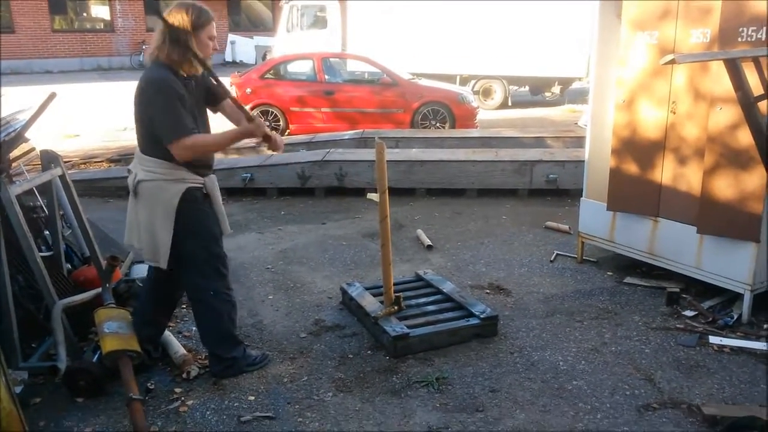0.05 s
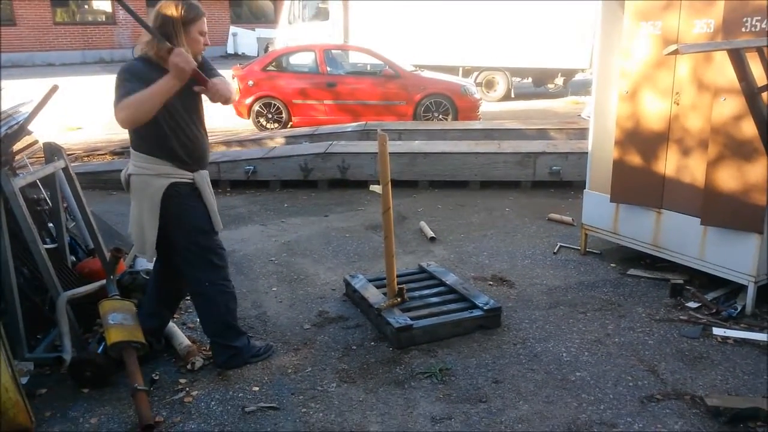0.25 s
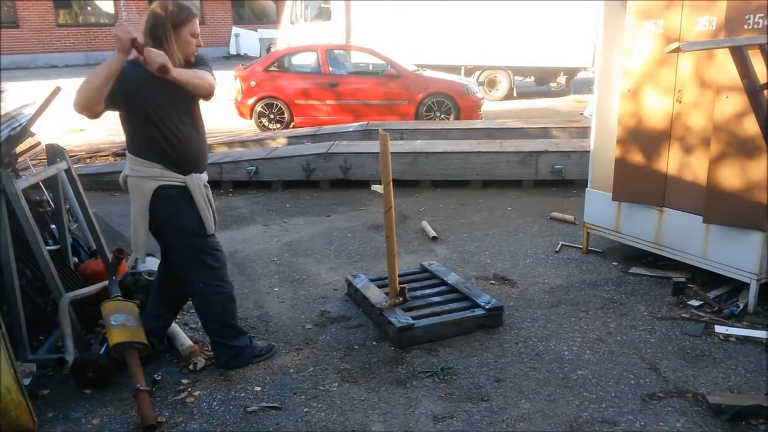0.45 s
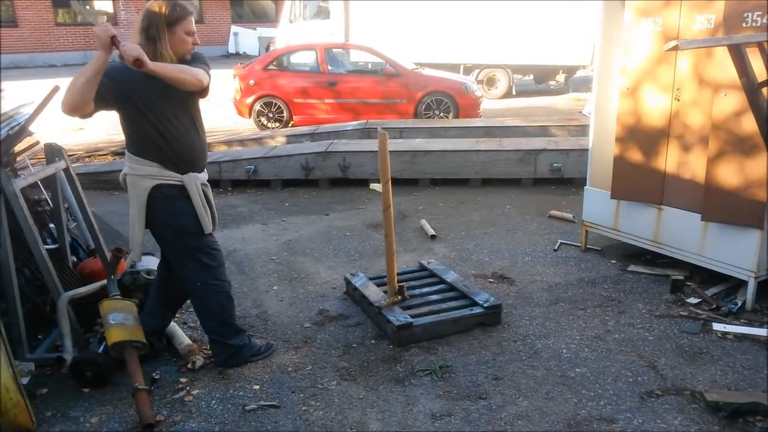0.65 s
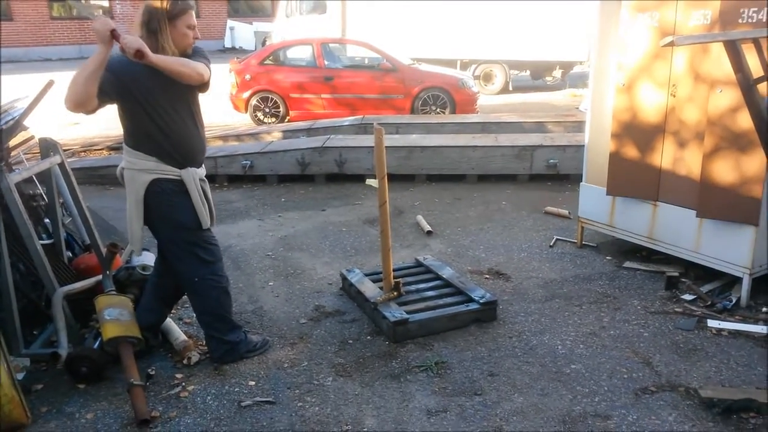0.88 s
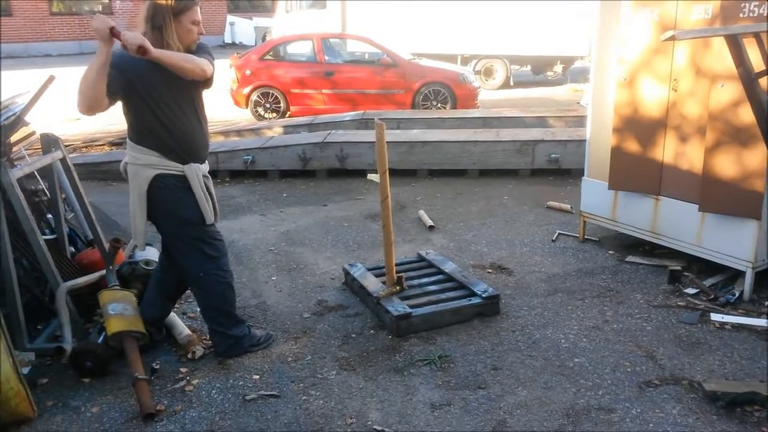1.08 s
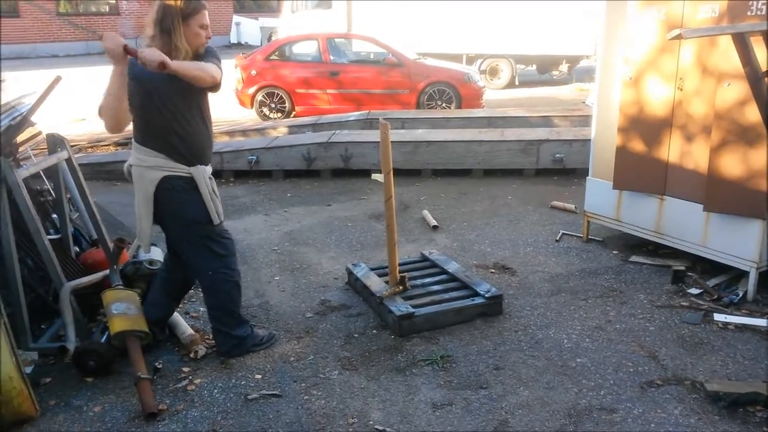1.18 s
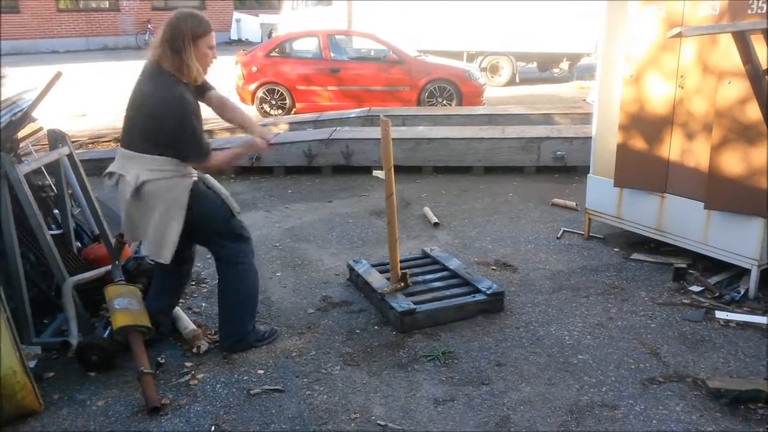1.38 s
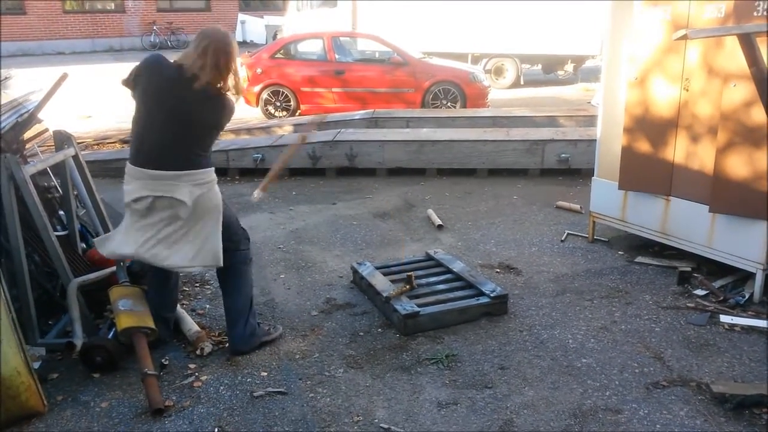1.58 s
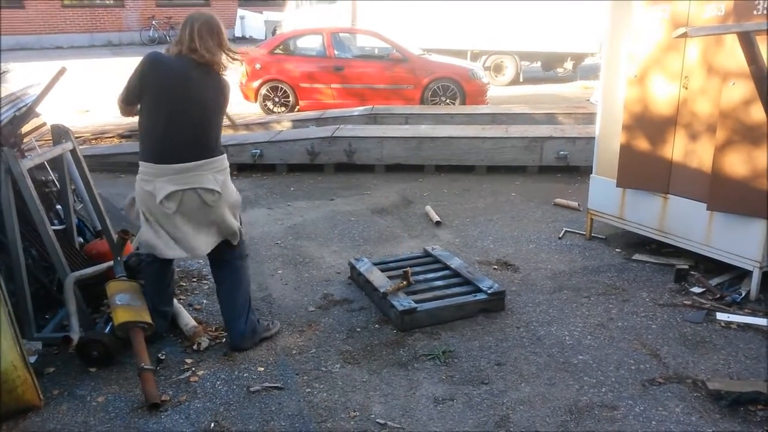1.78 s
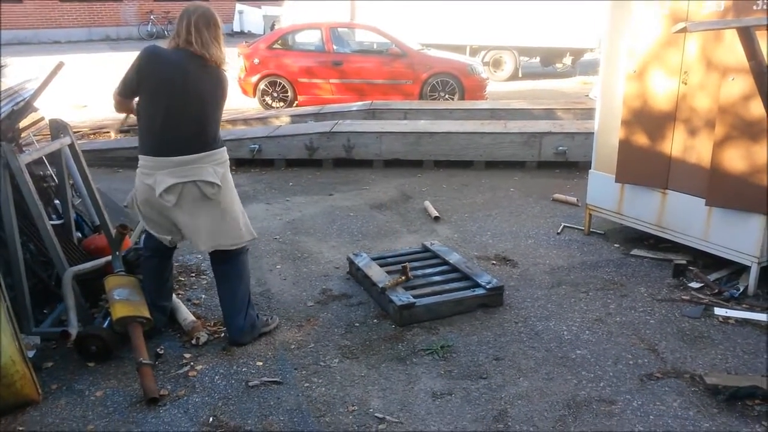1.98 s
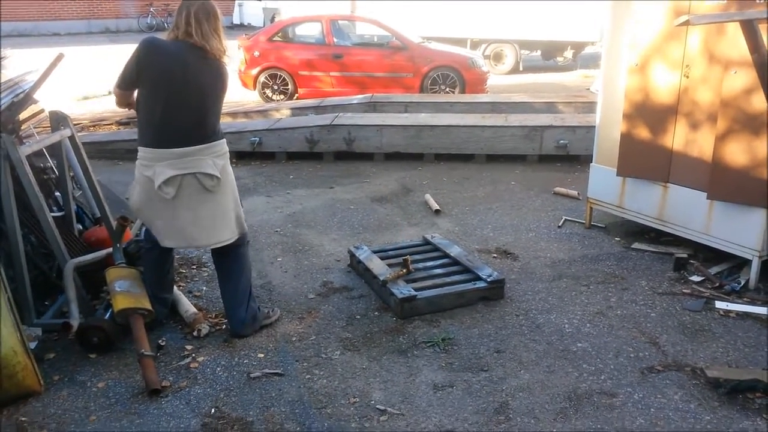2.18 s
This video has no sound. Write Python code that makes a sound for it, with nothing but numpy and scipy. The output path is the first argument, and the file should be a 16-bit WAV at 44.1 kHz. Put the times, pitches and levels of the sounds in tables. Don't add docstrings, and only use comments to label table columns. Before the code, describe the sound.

Sudden hard chop splits a wooden pole, then splinters tick and cut pieces clatter on the ground

```python
import sys
import numpy as np
from scipy import signal
from scipy.fft import rfft, irfft
from scipy.io import wavfile
from scipy.ndimage import uniform_filter1d

SR = 44100
rng = np.random.default_rng(int(sys.argv[2]) if len(sys.argv) > 2 else 0)


def elevation(decibels):
    levels = np.asarray(decibels, float)
    return 10 ** (levels / 20)


def int16_out(signal):
    q = np.round(np.clip(np.atleast_2d(signal).T, -1, 1) * 32767)
    wavfile.write(sys.argv[1], SR, q.astype(np.int16))


N = 99048
TIME = np.arange(N) / SR


def rms_one(x):
    return x / np.sqrt(np.mean(x ** 2) + 1e-20)


def at_hz(points, hz):
    table_hz, value = np.array(points).T
    return np.interp(np.log(hz), np.log(table_hz), value)


def filtered(x, order, hz, kind):
    return signal.sosfilt(signal.butter(order, hz, kind, fs=SR, output="sos"), x)


def drift(rate):
    every = 40
    r = np.exp(-2 * np.pi * rate * every / SR)
    slow = signal.lfilter([1], [1, -2 * r, r * r], rng.standard_normal(N // every + 2002))[2000:]
    return np.interp(np.arange(N) / every, np.arange(len(slow)), rms_one(slow - slow.mean()))


def grains(per_s, spread_db):
    size_db = spread_db * np.minimum(rng.exponential(1, N), 4)
    sizes = elevation(size_db) * rng.choice([-1, 1], N)
    return rms_one(sizes * (rng.random(N) < per_s / SR))


def dying(s, db, decay_s):
    since = np.maximum(TIME - s, 0)
    return elevation(db) * (TIME >= s) * np.exp(-since / max(decay_s, 1e-4))


# frequency in Hz, likeness from -1 to 1.
LIKENESS = [(60, 0.93), (290, 0.73), (620, 0.72), (1360, 0.0021), (3000, 0.34)]


def bands(size):
    edges = 22 * 2 ** np.arange(0, 10, .5)
    white = rng.standard_normal((2, 2, size))
    for k, (low, high) in enumerate(zip(edges, edges[1:])):
        mid, side = filtered(white[k % 2], 2, [low, high], "band")
        hz = np.sqrt(low * high)
        alike = np.clip(at_hz(LIKENESS, hz), -1, 1)
        yield hz, np.sqrt(1 + alike) * mid + np.sqrt(1 - alike) * side * [[1], [-1]]


# frequency in Hz, level in dB per Hz.
TOWN = [(25, -19), (60, 0.5), (150, -6.5), (450, -11), (800, -10), (2300, -21), (5000, -24.5), (14000, -30)]
TOWN_DB = -44


def town():
    together_db = 1.2 * drift(1.7)
    noise = 0
    for hz, band in bands(size=N):
        patchy_db = (-0.2 + 90 / hz) * drift(13.0)
        noise = noise + elevation(at_hz(TOWN, hz) + together_db + patchy_db) * band
    return elevation(TOWN_DB) * rms_one(noise)


# multiple of the mains frequency, level in dB rms.
HUM = [(2, -59), (3, -54.5), (4, -53.5), (5, -61), (6, -50.5), (7, -63), (10, -78), (12, -62.5),
       (14, -54.5), (16, -57), (18, -61), (20, -64), (24, -72)]
MAINS_HZ, HUM_WAVER_DB = 49.8, 2.5


def hum():
    out = 0
    for multiple, db in HUM:
        level = np.sqrt(2) * elevation(db + HUM_WAVER_DB * drift(12.0))
        out = out + level * np.sin(2 * np.pi * (round(multiple) * MAINS_HZ * TIME + rng.random()))
    return out


# frequency in Hz, t60 in seconds.
YARD_T60 = [(100, 0.62), (500, 0.35), (2000, 0.35), (5000, 0.44), (12000, 0.24)]
YARD_DB, YARD_GAP_S, YARD_LOW_HZ, ECHO_PATCHY_DB = -3.5, 0.0097, 110, 4


def yard(x):
    x = filtered(x, 2, YARD_LOW_HZ, "high")
    t = TIME[:SR // 2]
    tail = sum(band * elevation(-60 * t / at_hz(YARD_T60, hz)) for hz, band in bands(size=len(t)))
    tail = tail * (t > YARD_GAP_S) * elevation(ECHO_PATCHY_DB * drift(120)[:len(t)])
    tail = tail / np.sqrt(np.sum(tail ** 2) / 2)
    return elevation(YARD_DB) * signal.fftconvolve(x[None], tail, axes=1)[:, :N]


# time in seconds, level in dB.
RUSTLE = [
    (0, -53),
    (.3, -47),
    (.8, -53),
    (1.36, -63),
    (1.47, -40),
    (1.55, -39),
    (1.625, -36.5),
    (1.65, -44),
    (1.9, -78),
]
RUSTLE_LOW_HZ, RUSTLE_PER_S = 3500, 6900


def rustle():
    rub = filtered([grains(RUSTLE_PER_S, 7.5), grains(RUSTLE_PER_S, 1.3)], 2, RUSTLE_LOW_HZ, "high")
    return elevation(np.interp(TIME, *np.transpose(RUSTLE)) + 1.4 * drift(29.85)) * rub


TICK_TIMES = [1.483, 1.521, 1.525, 1.555, 1.773, 1.7895, 1.8272, 1.8545, 1.8615, 1.878, 1.8815, 1.885,
              1.8922, 2.197]
# level in dB, left-over-right balance in dB.
TICKS = [(-29, 3), (-29, 0), (-26, -2), (-29, 3), (-13, -4), (-9, 5), (-13, 4), (-12, 5), (-18, 2), (-7, 8),
         (-19, 6), (-12, 8), (-9, 8), (-9, -10)]
TICK_S, TICK_FUZZ = .0007, 0.14
TICK_LOW_HZ, TICK_TOP_HZ = 3300, 8600


def ticks():
    out = np.full((2, N), 1e-18)
    grit = TICK_FUZZ * rng.choice([-1., 1.], N)
    for s, (db, pan) in zip(TICK_TIMES, TICKS):
        click = elevation(db) * (np.arange(N) == int(s * SR))
        out += (grit * dying(s, db, TICK_S) + click) * elevation([[pan / 2], [-pan / 2]])
    return elevation(12.5) * filtered(out, 2, [TICK_LOW_HZ, TICK_TOP_HZ], "band")


# frequency in Hz, level in dB per Hz.
CRACK = [(150, -31), (400, 12), (800, -1.5), (1600, -10), (3000, -3), (6000, -18), (10000, -5), (15000, -3)]
SPLINTERS_PER_S, SPLINTER_SPREAD_DB = 10000, 2.6
CRACK_APART = 0.65


def cracks(blows):
    snaps = grains(SPLINTERS_PER_S, SPLINTER_SPREAD_DB)
    snaps = snaps + CRACK_APART * grains(SPLINTERS_PER_S, SPLINTER_SPREAD_DB) * [[1], [-1]]
    out = 0
    edges = 100 * 2 ** np.arange(0, 8.)
    for low, high in zip(edges, np.append(edges[1:], 19000)):
        tilt = np.log2(low / 1600) / 3
        envelope = sum(dying(s, db + bright_db * tilt, fall_s) for s, db, fall_s, _, bright_db in blows)
        burst = filtered(snaps * envelope + 1e-18, 1, [low, high], "band")
        out = out + elevation(at_hz(CRACK, np.sqrt(low * high)) + 2) * burst
    return out


STRIKE_SPREAD_DB, CONTACT_HZ, MOST_CYCLES = 6.5, 2460, 90


def knocks(blows, modes):
    start_s, _, _, knock_db, _ = np.array(blows).T
    at = (start_s * SR).astype(int)
    spread = rng.standard_normal((len(blows), len(modes)))
    out = 0
    for k, (hz, db, t60) in enumerate(modes):
        clicks = np.full(N, 1e-18)
        clicks[at] = elevation(knock_db + db - 8 + STRIKE_SPREAD_DB * spread[:, k]) * (-1) ** k
        r = elevation(-60 / (min(t60, MOST_CYCLES / hz) * SR))
        w = 2 * np.pi * hz / SR
        out = out + signal.lfilter([0, np.sin(w)], [1, -2 * r * np.cos(w), r * r], clicks)
    return filtered(out, 1, CONTACT_HZ, "low")


# start in seconds, crack level in dB, crack decay in seconds,
# knock level in dB, brightness in dB.
LANDINGS = [
    (2.0925, -23, .004, -17.5, -2),
    (2.0985, -22, 0.0072, -19.5, -3.5),
    (2.104, -30.5, 0.0084, -19, 5),
    (2.1812, -11.5, 0.0025, -36, 10),
    (2.186, -20, 0.0071, -20, 12),
    (2.193, -28, 0.0038, -16.5, 16),
    (2.2015, -35, 0.0036, -39, -13),
    (2.217, -22, 0.0045, -41, 7),
    (2.228, -32.5, 0.007, -36, -16.5),
    (2.238, -31, 0.0079, -50, 0),
]
# frequency in Hz, level in dB, t60 in seconds.
PIECE = [(200, -5, 0.039), (231, 1, 0.053), (297, -6.5, 0.063), (342, -9, 0.061), (476, 1.5, 0.052),
         (590, -10, 0.04), (720, -5, 0.02), (990, -8, 0.025), (2267, -3, 0.02), (2634, -1.5, .035),
         (4670, -2.5, 0.026)]


def pieces():
    return cracks(LANDINGS) + knocks(LANDINGS, PIECE)


# start in seconds, frequency in Hz, level in dB, t60 in seconds.
THUMPS = [
    (1.657, 203.7, -8.5, 0.31),
    (1.657, 213.9, -10, 0.51),
    (2.095, 168, -24, .06),
    (2.107, 223, -25, 0.16),
    (2.123, 263, -23, .07),
    (2.188, 275, -12, 0.072),
    (2.184, 430, -39, 0.04),
]
THUMP_PUSH_S, THUMP_SETTLES_S, SETTLE_DB_PER_S = 0.0066, .12, 350


def pallet():
    out = 0
    for s, hz, db, t60 in THUMPS:
        t = np.maximum(TIME - s, 0)
        fall_db = 60 * t / t60 + SETTLE_DB_PER_S * np.maximum(t - THUMP_SETTLES_S, 0)
        swell = 1 - np.exp(-t / THUMP_PUSH_S)
        out = out - swell * elevation(db - fall_db) * np.sin(2 * np.pi * hz * t)
    return out


# start in seconds, crack level in dB, crack decay in seconds,
# knock level in dB, brightness in dB.
BLOWS = [
    (1.6558, 4.5, 0.0027, -8, -1.5),
    (1.6585, -0.5, 0.0035, -14.5, -1.5),
    (1.662, -12, .006, -10.5, 15.5),
    (1.673, -20, 0.0017, -32, -2),
    (1.6952, -4.5, 0.0065, -23, 6),
    (1.711, -10.5, 0.0036, -27, -4),
    (1.735, -37, 0.0053, -31, 0),
    (1.757, -43.5, .008, -51, 7),
    (1.789, -22.5, 0.0042, -24, 0),
]
# frequency in Hz, level in dB, t60 in seconds.
WOOD = [(171, -19, 0.061), (333, -13.5, 0.094), (389, -5.5, 0.088), (413, -6.5, 0.1), (437, -21, 0.14),
        (521, -9.5, 0.17), (630, -13, 0.2), (653, -6, .11), (738, 6, .13), (846, -15.5, 0.075),
        (890, -21, 0.076), (1360, -25.5, .05), (1570, -9.5, 0.06), (2065, -12.5, .04)]


def pole():
    return cracks(BLOWS) + knocks(BLOWS, WOOD)


TOWN_RIGHT_LAG_S = .0003
LANDING_PAN_DB, LANDING_ECHO_DB, TICK_ECHO_DB = -1.5, -5.5, -9


def scene():
    far = town() + hum()
    far[1] = np.roll(far[1], int(TOWN_RIGHT_LAG_S * SR))
    chop, small, landed = pole(), ticks(), pieces()
    direct = chop + small + landed * elevation([[LANDING_PAN_DB / 2], [-LANDING_PAN_DB / 2]])
    to_walls = chop + elevation(TICK_ECHO_DB) * small + elevation(LANDING_ECHO_DB) * landed
    return direct + pallet() + yard(np.mean(to_walls, axis=0)) + far + rustle()


def port(hz, peaks, top_hz):
    boosts = [1 + (elevation(db) - 1) / (1 + 1j * q * (hz / f - f / hz)) ** 2 for f, q, db in peaks]
    return np.prod(boosts, axis=0) / (1 + 1j * hz / top_hz) ** 2


def band_limit(x):
    return signal.sosfilt(signal.butter(12, 14790, fs=SR, output="sos"), x)


# frequency in Hz, sharpness as Q, boost in dB.
PORTS = [
    [(4923, 5.08, 19), (2105, 1.83, 7.5), (13000, 1.3, 0.5)],
    [(10190, 3.4, 9), (743, 2, 1.5)],
]
PORT_TOP_HZ = [4540, 13000]
SELF_HISS_DB, BASS_CUT_HZ, CUTOFF_HZ = -57.5, 29.4, 14550
DUCK_FROM_DB, DUCK_SHARE, DUCK_S = -23, 0.64, 0.089
SAG_DB_PER_S = 1


def record(dry):
    hz = np.arange(1, N // 2 + 2) * SR / N
    holes = [port(hz, peaks, top_hz) for peaks, top_hz in zip(PORTS, PORT_TOP_HZ)]
    x = irfft(rfft(dry) * holes, N) + elevation(SELF_HISS_DB) * rng.standard_normal((2, N))
    x = filtered(x, 1, BASS_CUT_HZ, "high")
    level_db = 10 * np.log10(uniform_filter1d(np.mean(x ** 2, axis=0), size=441) + 1e-12)
    over_db = DUCK_SHARE * np.maximum(level_db - DUCK_FROM_DB, 0)
    sag_db = SAG_DB_PER_S * TIME
    peak_db = np.maximum.accumulate(np.where(over_db > 0, over_db - sag_db, 0))
    held_db = np.maximum(peak_db + sag_db, 0)
    r = np.exp(-1 / (DUCK_S * SR))
    x = x * elevation(-signal.lfilter([1 - r], [1, -r], held_db))
    top_cut = signal.ellip(12, .5, 60, CUTOFF_HZ - 50, fs=SR, output="sos")
    x = signal.sosfilt(top_cut, np.clip(x, -1, 1))
    return band_limit(np.clip(x, -1, 1))


dry = scene()
out = record(dry)
int16_out(out)
```